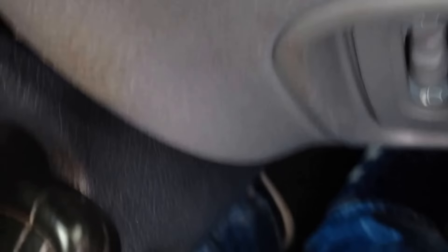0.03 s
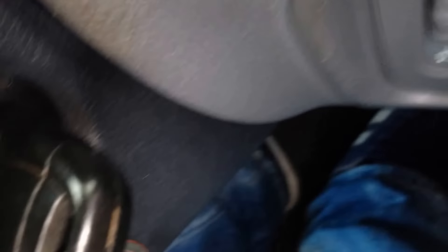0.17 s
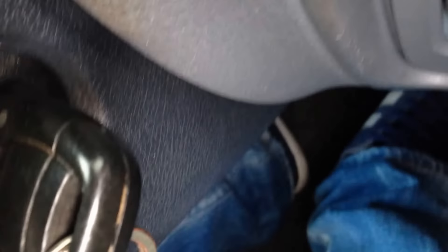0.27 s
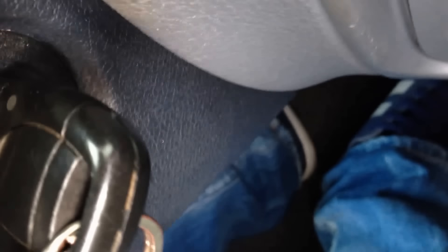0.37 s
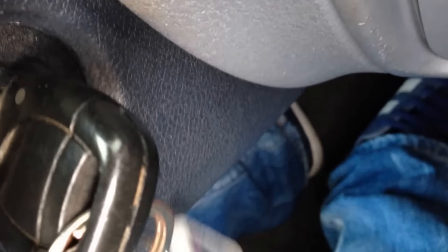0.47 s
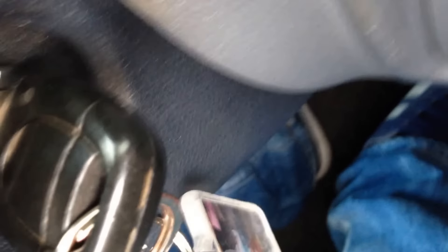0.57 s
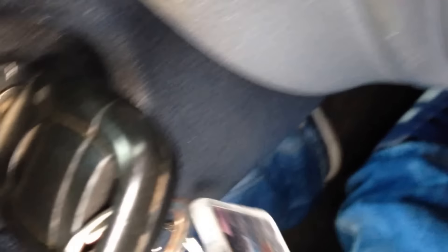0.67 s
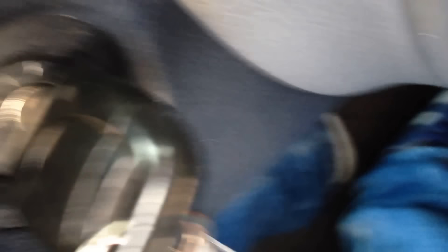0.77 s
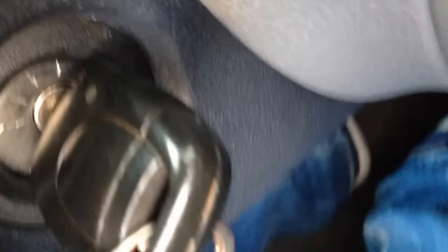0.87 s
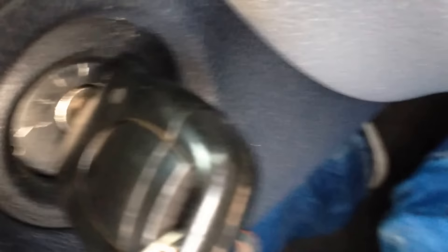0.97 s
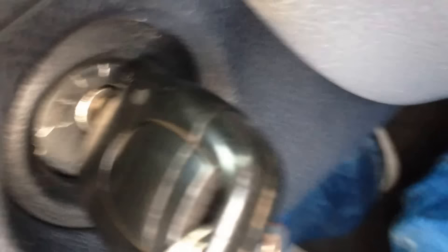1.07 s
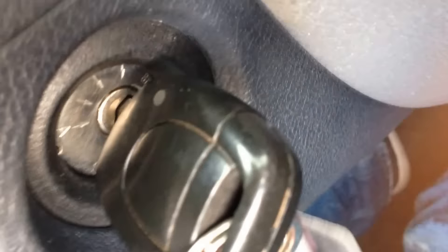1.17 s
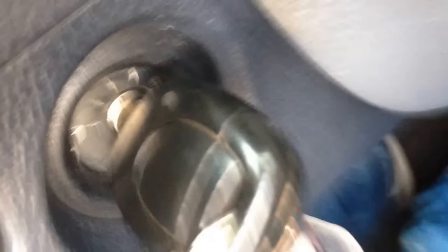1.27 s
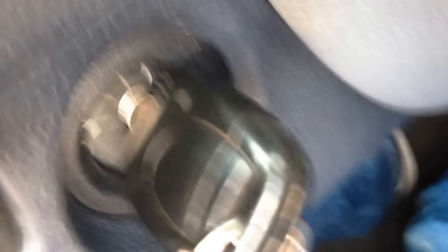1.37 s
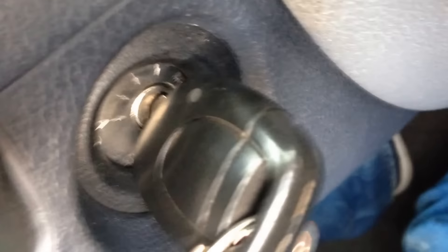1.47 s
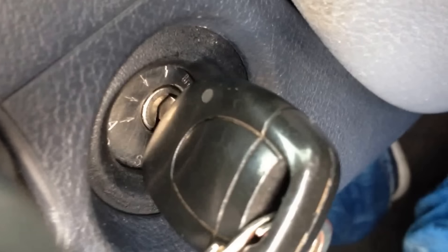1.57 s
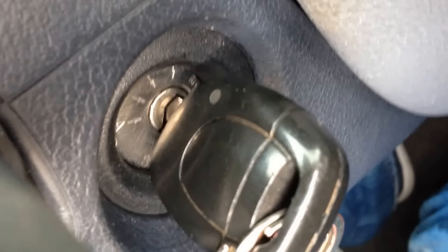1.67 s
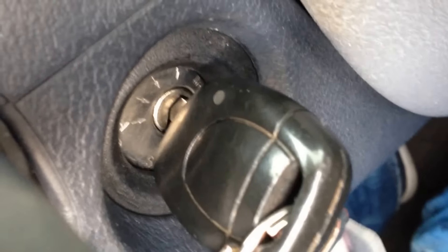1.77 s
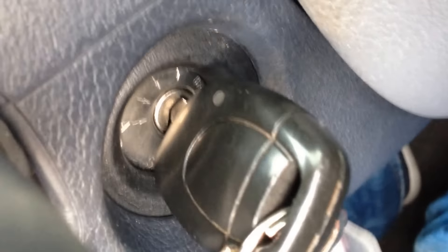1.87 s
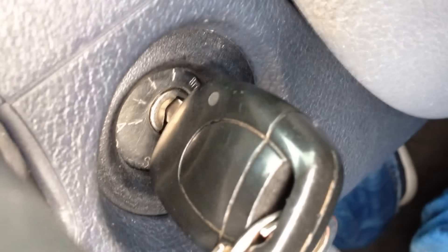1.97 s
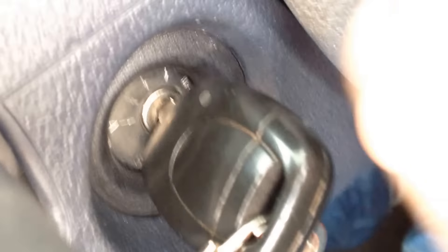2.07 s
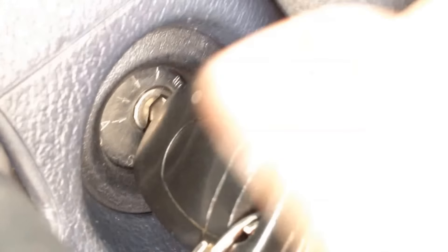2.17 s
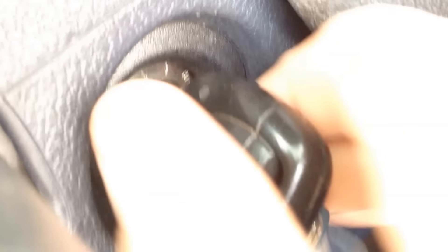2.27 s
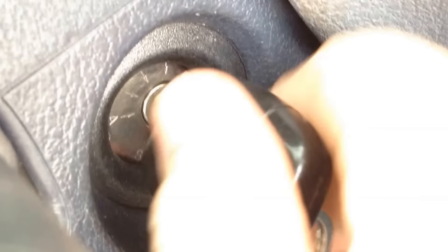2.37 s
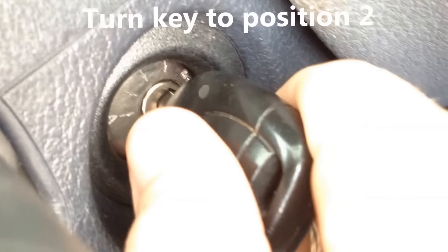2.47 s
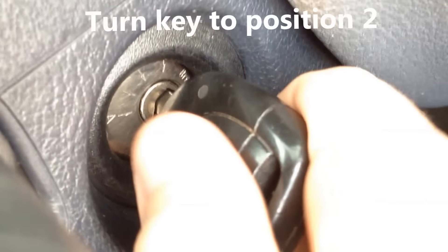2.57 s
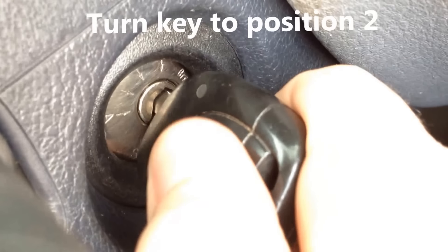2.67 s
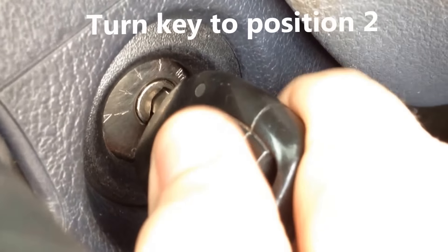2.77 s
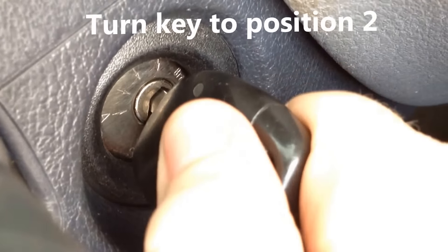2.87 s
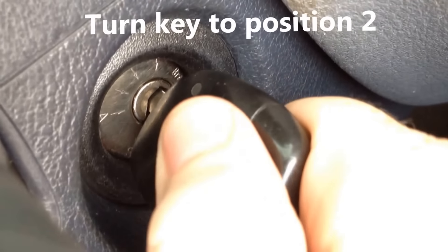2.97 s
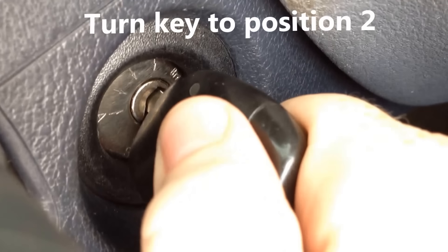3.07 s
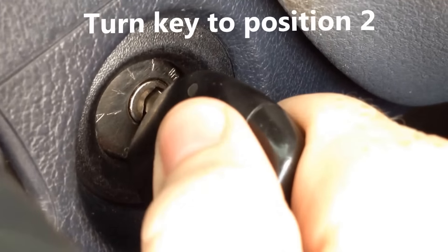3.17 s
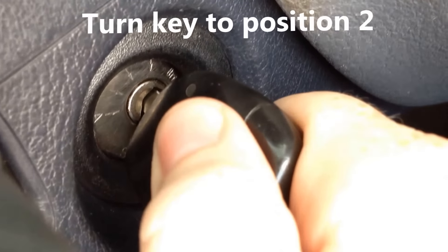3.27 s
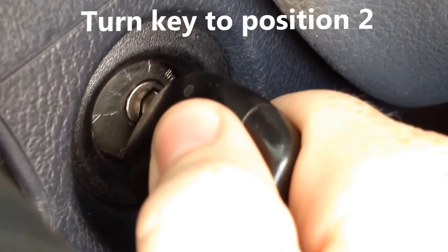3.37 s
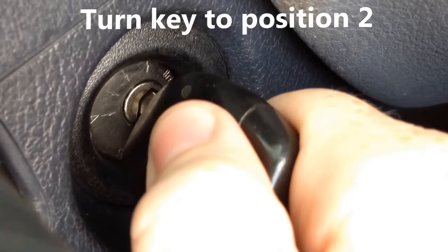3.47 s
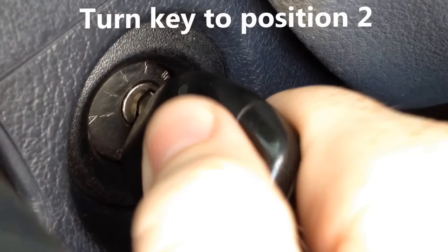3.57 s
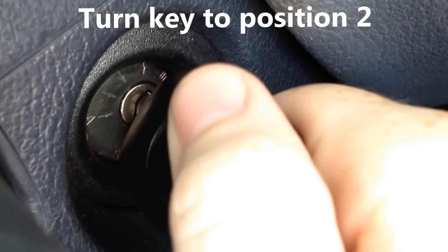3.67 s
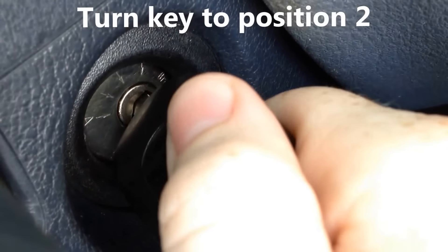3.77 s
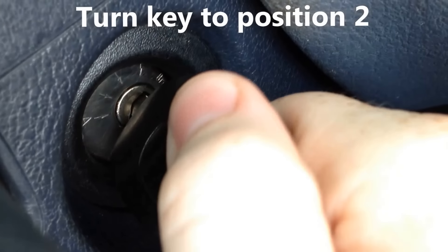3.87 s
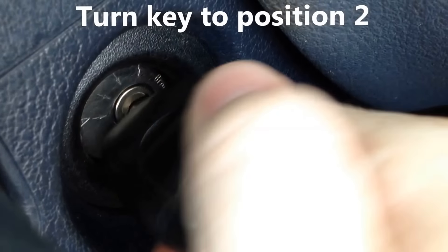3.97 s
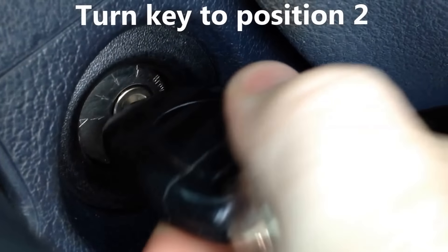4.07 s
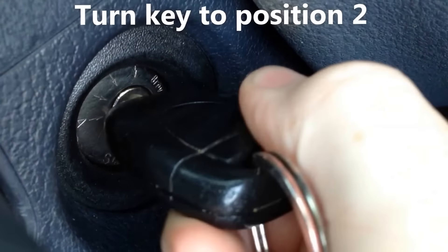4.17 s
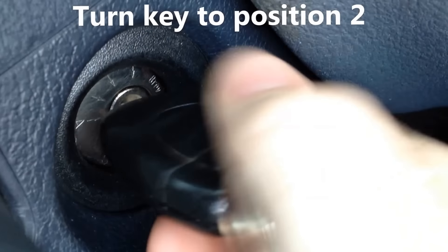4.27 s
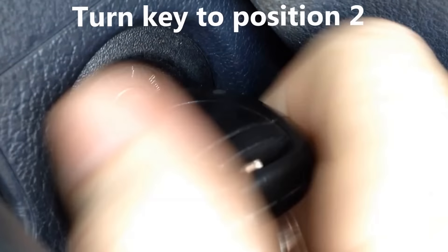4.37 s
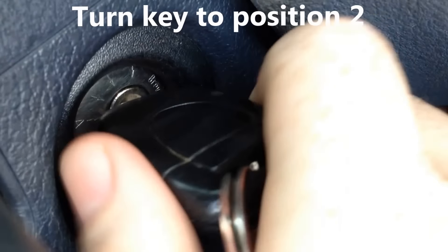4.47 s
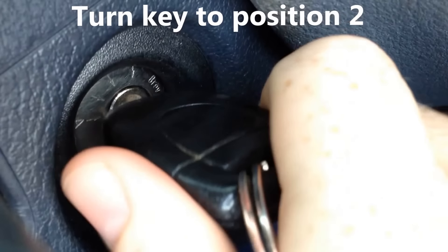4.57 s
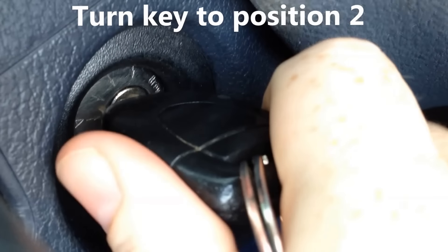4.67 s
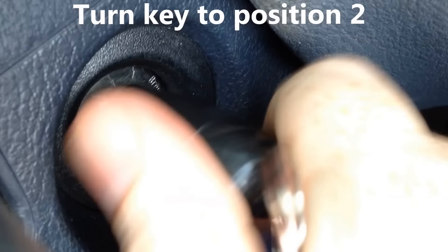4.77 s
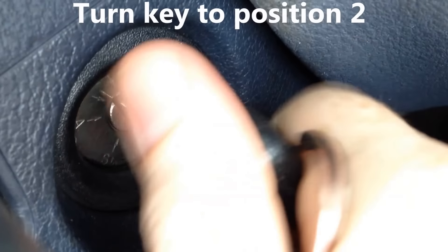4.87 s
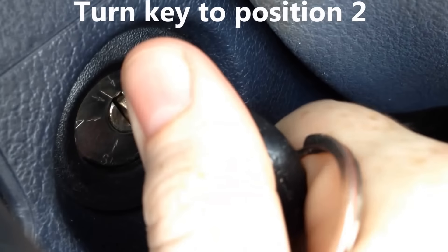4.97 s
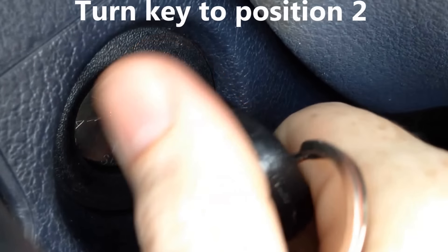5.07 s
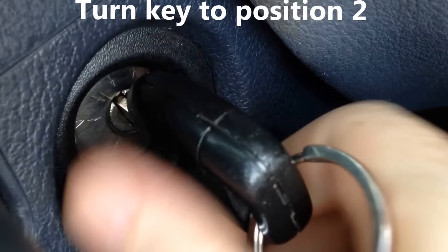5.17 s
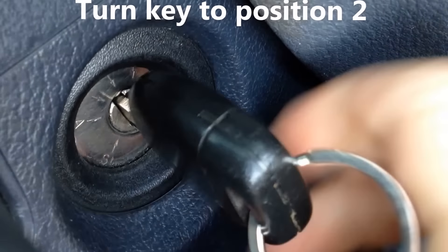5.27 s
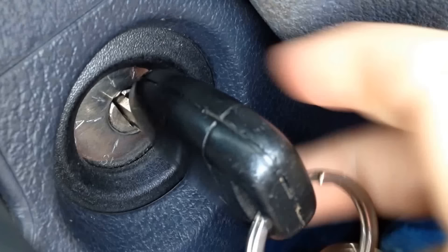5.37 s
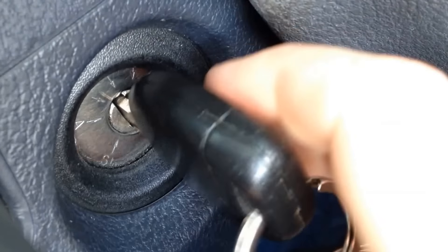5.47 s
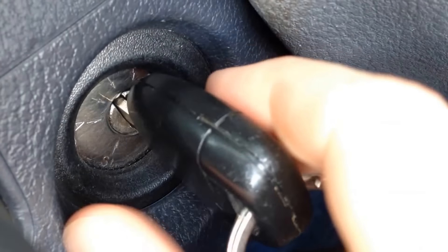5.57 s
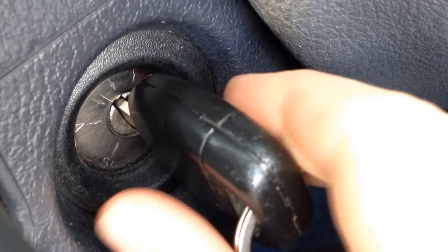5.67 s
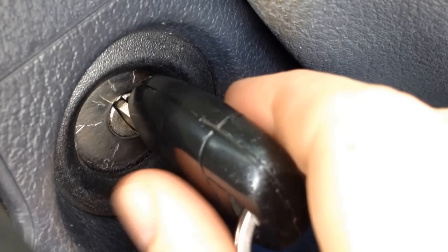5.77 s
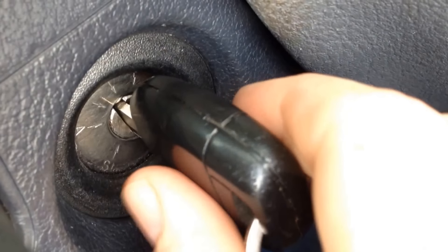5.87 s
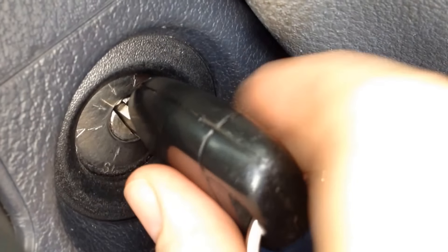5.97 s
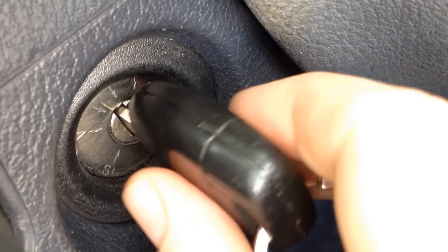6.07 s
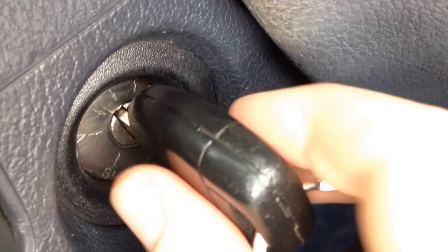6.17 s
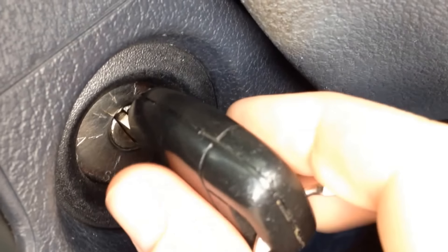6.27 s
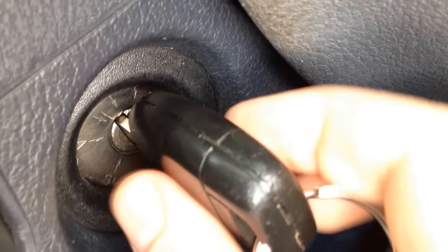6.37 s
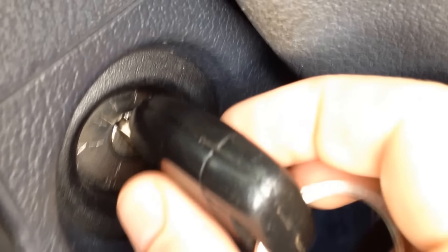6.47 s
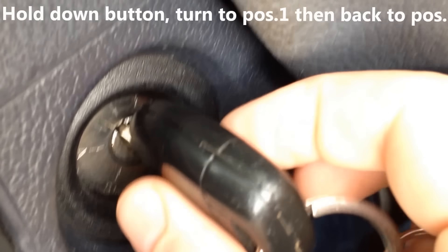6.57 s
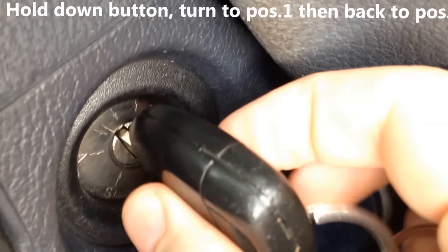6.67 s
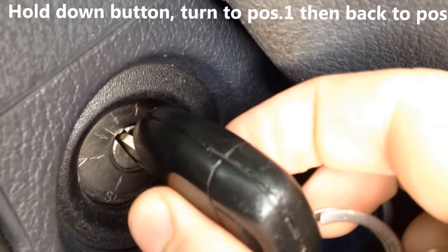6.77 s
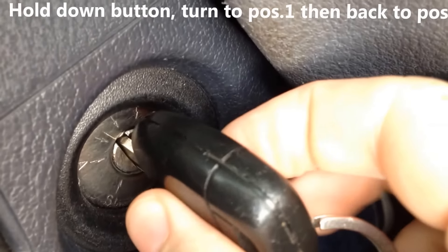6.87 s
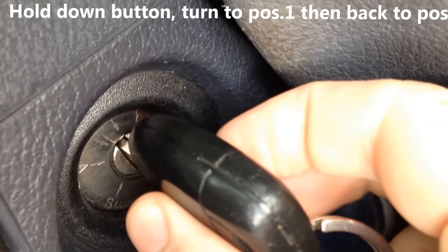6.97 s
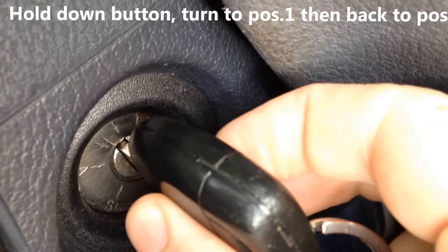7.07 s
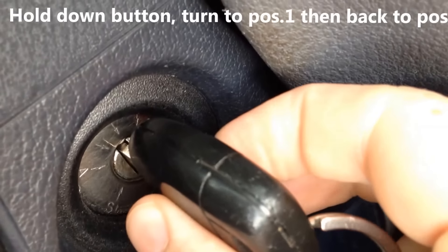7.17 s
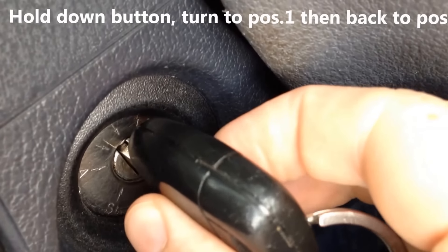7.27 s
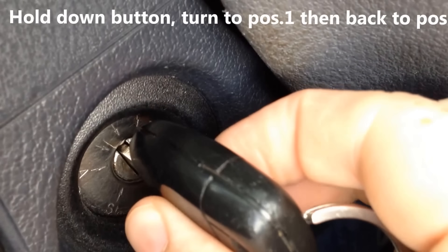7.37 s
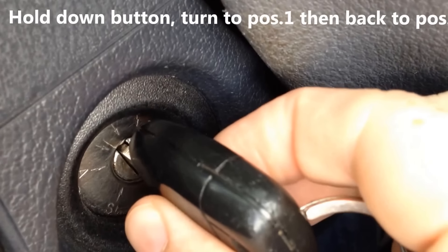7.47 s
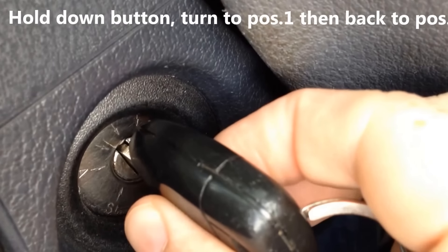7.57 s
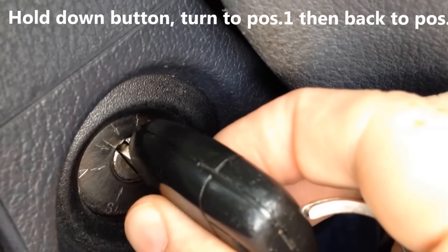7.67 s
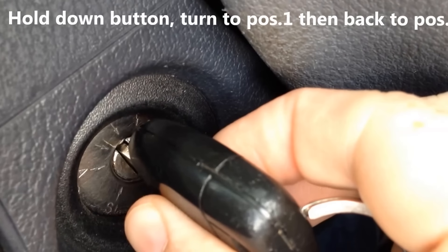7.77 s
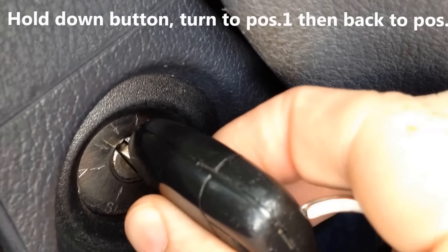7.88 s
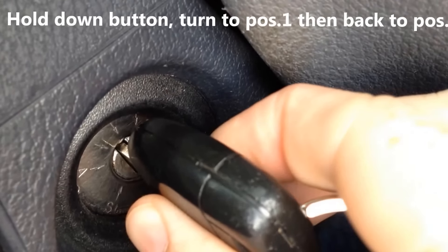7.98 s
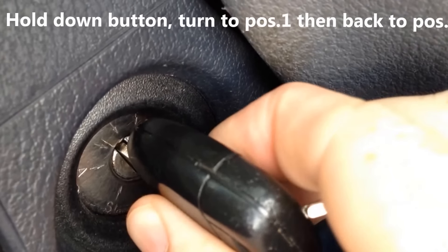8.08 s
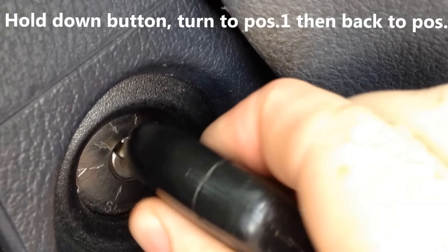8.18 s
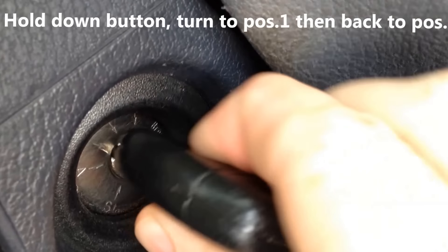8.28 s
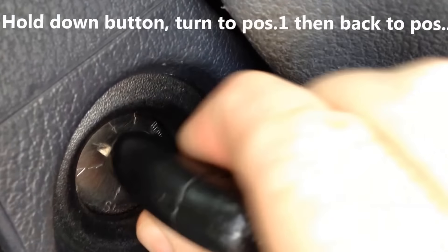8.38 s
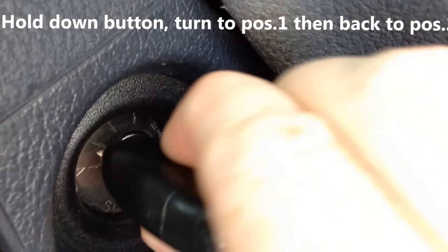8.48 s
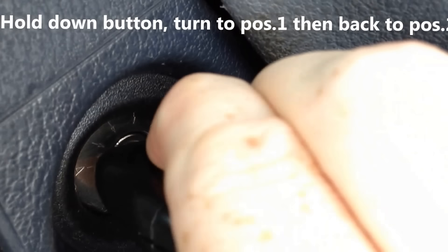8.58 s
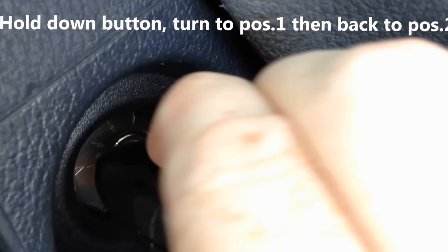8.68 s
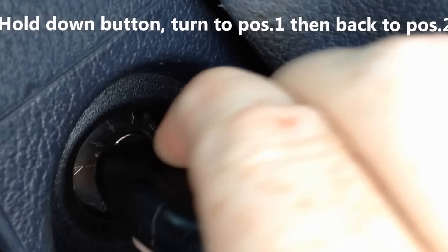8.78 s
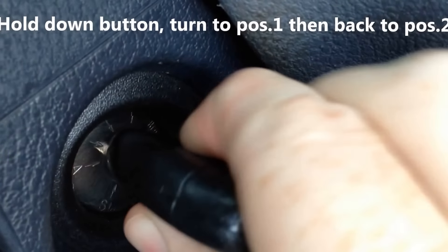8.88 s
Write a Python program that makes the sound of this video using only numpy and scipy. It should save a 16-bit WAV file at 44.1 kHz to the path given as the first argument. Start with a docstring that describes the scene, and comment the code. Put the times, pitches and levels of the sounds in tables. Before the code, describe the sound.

Very close, dry sound inside a quiet parked car. Soft bumps and brushing fingers come first, with a few light clicks. Then the key turns: hard snappy lock catches with dull plastic knocks from the column, in a quick irregular cluster. The steel key ring clinks in a short bright chatter, followed by scattered small clicks, a crisp button snap and faint regripping, over low handling rumble and hiss.

```python
"""A hand works a car key in the ignition lock, close to a hand-held microphone in a quiet, dead cabin.
First come bumps (low decaying sines), brushing fingers (filtered noise), a groan and light clicks.
From about 2 to 5 s the lock catches, thickest after 4 s: a crack, a short shudder and a modal column knock.
The steel ring then clinks (decaying sines and chatter), clicks go on, a button snaps at 7.5 s,
and regripping, knocks and a last catch follow; hush, rumble and hiss (shaped noise) lie under it all."""
import sys
import numpy as np
from scipy import signal
from scipy.fft import rfft, irfft, next_fast_len
from scipy.io import wavfile
from scipy.ndimage import uniform_filter1d, map_coordinates

SR = 44100
rng = np.random.default_rng(int(sys.argv[2]) if len(sys.argv) > 2 else 0)


def bounce(signal):
    """Save signal as a 16-bit WAV file at the path given by the first command-line argument."""
    frames = np.transpose(np.atleast_2d(signal))
    limited = np.clip(frames, -1, 1)
    pcm = np.round(limited * 32767).astype(np.int16)
    wavfile.write(sys.argv[1], SR, pcm)


N = 393813
TIME = np.arange(N) / SR  # scene clock, s
AGE = np.arange(SR // 4) / SR  # time since a contact, s
AGE_SPAN_S = len(AGE) / SR
TOP_HZ = 15300  # upper band limit


def amp(db):
    """Decibels to gain."""
    return 10 ** (np.asarray(db) / 20)


def unit(x):
    """Scale to rms 1."""
    return x / np.sqrt(np.mean(x ** 2) + 1e-20)


def packed(x):
    """Scale to the energy of one millisecond at rms 1."""
    return x * np.sqrt(SR / 1000 / np.sum(x ** 2))


def along(points, hz):
    """Read (f/Hz, value) points on a log frequency axis."""
    f, v = np.transpose(points)
    return np.interp(np.log(hz + 1), np.log(f), v)


def add(track, s, x):
    """Mix x into the track from time s."""
    part = track[max(round(s * SR), 0):][:len(x)]
    part += x[:len(part)]


def wobble(rate):
    """A smooth random curve, rate knots a second."""
    knots = rng.standard_normal(int(N * rate / SR) + 4)
    return map_coordinates(knots, [TIME * rate])


def coloured(x, db_of):
    """Causal minimum-phase filter whose gain is db_of(f/Hz)."""
    m = 2 * next_fast_len(len(x) // 2 + 1024)
    gain = amp(db_of(np.fft.rfftfreq(m, 1 / SR)))
    cepstrum = irfft(np.log(gain + 1e-6))
    # fold the cepstrum onto positive time
    cepstrum[1:m // 2] *= 2
    cepstrum[m // 2 + 1:] = 0
    return irfft(rfft(x, m) * np.exp(rfft(cepstrum)))[:len(x)]


def noise_bed(spectrum):
    """Steady noise of the given spectrum, rms 1."""
    return unit(coloured(rng.standard_normal(N), lambda hz: along(spectrum, hz)))


def fade(t60):
    """An exponential decay by 60 dB in t60 seconds, played no shorter than 2 ms."""
    return 10 ** (-3 * AGE / max(t60, .002))


def burst(t60):
    """A decaying noise burst with its spectrum smoothed flat."""
    x = rng.standard_normal(len(AGE)) * fade(t60)
    power = np.abs(uniform_filter1d(np.abs(rfft(x)) ** 2, size=450))
    bins_hz = np.fft.rfftfreq(len(x), 1 / SR)
    return packed(coloured(x, lambda hz: -10 * np.log10(np.interp(hz, bins_hz, power))))


# outside hush over time: t/s, level/dB before the air trim
HUSH_LEVEL = [(0.0, -66), (1.56, -67), (3.68, -67), (4.13, -61), (5.0, -63), (5.84, -66.5), (8.93, -68.5)]
# outside hush through the closed car, spectrum: f/Hz, level/dB
HUSH_SPECTRUM = [(71, -36.5), (120, 4), (163, -20.5), (198, 2.5), (265, -6), (316, -0.5), (388, -6.5),
                 (577, -5), (680, -7.5), (880, -1.5), (1130, -5.5), (1410, -12), (1680, -15.5),
                 (2100, -21.5), (4000, -32), (5200, -59.5), (8800, -120)]
# rumble of the held microphone, spectrum: f/Hz, level/dB
RUMBLE_SPECTRUM = [(12, -51), (20, -30.5), (36, -9), (54, 2.5), (81, 0), (113, -0.5), (155, -8),
                   (217, -4.5), (260, -9.5), (340, -35.5), (570, -120)]
ARM_SETTLE_S = 0.41  # the holding hand is stirred this long around a movement
RUMBLE_GROWS = .5  # stirred rumble, dB per dB of movement
HISS_DB = -74  # the microphone's steady hiss


def cabin(move_db, still_db, stirred_db, air_db):
    """A soft outside hush in the closed car, a faint hiss, and a handling rumble that grows with movement."""
    stir = amp(RUMBLE_GROWS * (move_db - move_db.max()))
    stir = uniform_filter1d(stir, size=max(round(ARM_SETTLE_S * SR), 1))
    rumble = noise_bed(RUMBLE_SPECTRUM) * amp(2 * wobble(9))
    air = noise_bed(HUSH_SPECTRUM) * amp(.7 * wobble(8))
    hiss = noise_bed([(900, -19.5), (2400, 1.5), (5000, -0.5), (10000, -3.5), (15000, -3.5)])
    rumble_gain = amp(still_db) + amp(stirred_db) * stir
    hush_db = np.interp(TIME, *np.transpose(HUSH_LEVEL)) + air_db
    return rumble_gain * rumble + amp(hush_db) * air + amp(HISS_DB) * hiss


# the hand leans on the column and it groans: t/s, length/s, level/dB, nominal f/Hz just above the band
COLUMN_GROANS = [(0.763, 0.18, -60, 78), (2.752, 0.69, -68, 57), (7.68, 0.67, -61, 61)]


def groans():
    """Narrow low swells of filtered noise under the weight of the hand."""
    out = np.zeros(N)
    for s, length, db, hz in COLUMN_GROANS:
        band = signal.butter(2, [hz * 0.78, hz * 0.98], "band", fs=SR, output="sos")
        swell = signal.sosfilt(band, rng.standard_normal(SR))[-round(length * SR):]
        add(out, s, amp(db) * unit(swell) * signal.windows.tukey(len(swell)))
    return out


# the hand reaches, takes hold, turns and regrips: t/s, length/s, movement level/dB
HAND_MOVES = [(0.752, 0.21, -74), (1.057, .29, -75.5), (1.557, .12, -79), (2.023, .27, -65.5),
              (2.323, .14, -73.5), (2.5, .2, -65), (2.761, .25, -74.5), (3.677, 0.13, -77),
              (4.073, .22, -69.5), (4.346, 0.19, -60), (4.88, 0.24, -69), (5.233, 0.46, -63),
              (5.715, 0.41, -75), (6.158, .43, -68.5), (6.671, .28, -70), (8.233, .22, -71),
              (8.553, .38, -73.5)]
MOVE_ATTACK_S, MOVE_RELEASE_S = .1, 0.15  # every movement swells and dies away alike


def movement(rest_db):
    """How briskly the hand moves, in dB: each move swells, holds and dies away."""
    power = np.full(N, amp(rest_db) ** 2)
    for s, length, db in HAND_MOVES:
        gate = np.minimum((TIME - s) / MOVE_ATTACK_S, (s + length - TIME) / MOVE_RELEASE_S)
        power += (amp(db) * np.clip(gate + .5, 0, 1)) ** 2
    return 10 * np.log10(power)


def thud(db, hz, t60, rise=.0018):
    """A soft push on plastic: a few low cycles."""
    onset = 1 - np.exp(-(AGE / rise) ** 2)
    return amp(db) * np.sin(2 * np.pi * hz * AGE) * fade(t60) * onset


def pats(move_db, above_db, spread_db, hz, count):
    """The shifting hand pats the column at random, mostly while it moves."""
    out = np.zeros(N)
    motion = np.cumsum(amp(move_db / 2))
    for when, size, pitch in rng.random((count, 3)):
        at = np.searchsorted(motion, when * motion[-1])
        db = move_db[at] / 2 + above_db + spread_db * size
        add(out, at / SR, thud(db, hz * 4 ** (pitch - .5), .05))
    return out


# soft bumps of hand and column: t/s, level/dB before the mix trim, f/Hz, t60/s
SOFT_BUMPS = [(0.2963, -20.5, 203, 0.028), (.2965, -39, 630, 0.021), (1.101, -43.5, 108.4, 0.079),
              (1.662, -35.5, 169.4, 0.092), (1.922, -24, 121, 0.016), (2.046, -25.5, 431, 0.04),
              (2.068, -41.5, 109, .13), (4.246, -33, 128, 0.15), (4.995, -21, 244, 0.047),
              (5.052, -32, 168, .05), (5.059, -33.5, 75, 0.26), (5.096, -32, 124, 0.055),
              (5.626, -35.5, 233, 0.062)]


def bumps():
    """Flesh pushes plastic into a few damped low cycles."""
    out = np.zeros(N)
    for s, db, hz, t60 in SOFT_BUMPS:
        add(out, s, thud(db, hz, t60))
    return out


def friction(spectrum, grain_db):
    """Grainy, uneven noise of skin brushing textured plastic."""
    grains = rng.standard_normal(N) * amp(grain_db * wobble(700))
    spectra = signal.stft(grains, nperseg=512)[2]
    # random patches of level, smoothed across frequency, then time
    patches = uniform_filter1d(rng.standard_normal(spectra.shape), size=6, axis=0)
    patches = unit(uniform_filter1d(patches, size=7, axis=1))
    brushing = signal.istft(spectra * amp(1.6 * patches), nperseg=512)[1][:N]
    return unit(coloured(brushing, lambda hz: along(spectrum, hz)))


# skin on plastic, spectrum: f/Hz, level/dB
SKIN_SPECTRUM = [(900, -26.5), (2000, 1.5), (3000, -5.5), (4500, -2), (7000, -4.5), (10500, -4),
                 (13500, -2), (15300, -1.5)]
# hollow fob sounded by rubbing, spectrum: f/Hz, level/dB
FOB_SPECTRUM = [(1200, -26.5), (2000, -10.5), (2350, 1.5), (2700, -6), (3100, 2.5), (3700, -12),
                (5000, -13.5), (9000, -33)]
# short slips of fingers and ring on the fob:
# t/s, length/s, level/dB, squeak f/Hz (held to TOP_HZ), squeak level/dB relative to the slip
FOB_SLIPS = [(1.238, 0.091, -67.5, 3280, 2), (2.037, 0.06, -66.5, 2460, 3),
             (2.356, 0.059, -60.5, 3100, -3.5), (2.71, 0.11, -80, 4800, 1),
             (4.204, 0.042, -50.5, 3000, -11), (4.347, 0.087, -65, 13500, 1),
             (4.471, 0.044, -52, 3500, -21), (4.88, 0.062, -61.5, 2420, -1),
             (5.033, 0.022, -48.5, 11600, -5), (5.054, 0.066, -64.5, 2840, 5),
             (5.125, 0.097, -68, 2920, -2), (5.228, 0.09, -70.5, 7900, 11),
             (5.752, 0.023, -57.5, 12000, -11), (6.86, 0.038, -58.5, 3250, -9),
             (6.901, .11, -68.5, 3250, -4), (8.243, 0.089, -67, 2800, -0.5), (8.346, 0.029, -53, 3000, -16),
             (8.4, 0.078, -67.5, 2800, 4.5)]


def fingers(move_db, hiss_db, fob_db):
    """Moving skin brushes the plastic and sounds the hollow fob; slips swell and excite a narrow squeak."""
    grain_db = np.clip((move_db + 66.5) * .25, 0, 3)  # firmer rubbing is coarser
    out = amp(move_db + hiss_db + .7 * wobble(37)) * friction(SKIN_SPECTRUM, grain_db)
    out += amp(move_db + fob_db + 3.1 * wobble(30)) * friction(FOB_SPECTRUM, grain_db=8)
    rough = friction(SKIN_SPECTRUM, grain_db=3.0)
    for s, length, db, hz, squeak_db in FOB_SLIPS:
        stroke = rough[round(s * SR):][:round(length * SR)]
        resonance = signal.iirpeak(min(hz, TOP_HZ), hz / 600, SR)  # about 600 Hz wide
        squeak = unit(signal.filtfilt(*resonance, stroke))
        swell = signal.windows.tukey(len(stroke), .8)
        add(out, s, amp(db) * swell * (stroke + amp(squeak_db) * squeak))
    return out


def ticks(move_db, above_db, spread_db, count):
    """Loose ring and keys tick faintly, more often and louder the more the fingers move."""
    out = np.zeros(N)
    motion = np.cumsum(amp(move_db))
    for when, size, mode in rng.random((count, 3)):
        at = np.searchsorted(motion, when * motion[-1])
        hz = RING_MODES[int(mode * len(RING_MODES))][0]
        line = np.sin(2 * np.pi * hz * AGE) * fade(.03)
        tick = packed(rng.standard_normal(len(AGE)) * fade(0.0099)) + 0.53 * packed(line)
        add(out, at / SR, amp(move_db[at] + above_db + spread_db * size ** 2) * tick)
    glint = [(2200, -1), (3200, 4.5), (5000, 1.5), (9000, 1)]  # f/Hz, level/dB
    return coloured(out, lambda hz: along(SNAP_SPECTRUM, hz) + along(glint, hz))


def shimmer(t60, count):
    """Scattered modes of small parts, other ones for each point of contact."""
    age = AGE[:len(AGE) // 2]
    hz = rng.uniform(1500, TOP_HZ, (count, 1))
    size, phase = rng.random((2, count, 1))
    modes = np.sum(size * np.sin(2 * np.pi * (hz * age + phase)), axis=0)
    return packed(modes * fade(t60)[:len(age)])


def contact(db_of, t60, crack_db, tail_db, tail_t60):
    """A hard contact: a crack and its instant rebound, the part's short shudder and a weak ringing tail."""
    crack = np.zeros(len(AGE))
    crack[[4, rng.integers(14, 48)]] = 1, rng.uniform(-.6, .6)
    blow = amp(crack_db) * packed(crack) + burst(t60)
    add(blow, 0, amp(tail_db) * shimmer(tail_t60, count=45))
    return packed(coloured(blow, db_of))


def rebounds(first_db, t60, count):
    """Loose steel chatters: more touches, closest together at first and weaker the later they come."""
    train = np.zeros(SR // 30)
    at = SR // 1000 + (rng.random(count) ** 2 * (SR // 35)).astype(int)
    train[at] = amp(first_db) * fade(t60)[at] * rng.standard_normal(count)
    train[0] = 1
    return train


# the steel ring meets fob and keys:
# t/s, level/dB as if packed in 1 ms before the mix trim, bite/dB up to 3 kHz, top/dB from 8 kHz
RING_CLINKS = [(5.3781, -30, -5.5, -18), (5.3957, -33, -7, -25), (5.4164, -28.5, 16, -9),
               (5.4233, -13, -12.5, -13), (5.4383, -14.5, -9, -3), (5.447, -20, 6.5, -4),
               (5.452, -8.5, -12, -7.5), (5.539, -24.5, 2, -10), (5.5463, -13, -0.5, 2),
               (5.5513, -15.5, 6, -1.5), (5.5648, -23, -8, -9), (6.254, -37.5, 0, -18),
               (6.3182, -29.5, -8.5, 2), (6.3842, -40.5, -2, -22), (6.4491, -45, 0, 21),
               (6.5689, -30, 3.5, -7), (6.6231, -34.5, 9, -1.5)]
# modes of the steel ring: f/Hz, level/dB before random spread, t60/s before the fingers' damping
RING_MODES = [(2533, -3, 0.099), (4620, -18, .1), (5060, -19.5, 0.075), (5100, -16, .07), (5670, -20, 0.12),
              (6837, 4.5, 0.055), (8110, -9.5, 0.0746), (9570, 2.5, .09), (10980, -2, 0.073),
              (11350, -7, 0.079), (14000, 3.5, 0.089), (15080, -2.5, 0.061)]
# touch of ring on its neighbours, spectrum: f/Hz, level/dB
CHINK_SPECTRUM = [(200, -9.5), (1000, -16.5), (1450, -1), (1900, -11), (2600, -1), (3800, -2), (5100, 4),
                  (6500, -5.5), (8500, 3.5), (11000, 2), (15300, 2.5)]
CLINK_T60_S = 0.014  # the shudder of each touch
RING_GROWS = .08  # harder clinks ring more freely, dB per dB


def key_ring(ring_db):
    """Clinks ring the steel modes at new strengths; the ring chatters on its neighbours, damped by fingers."""
    out = np.zeros(N)
    for s, db, bite_db, top_db in RING_CLINKS:
        tone = lambda hz: along([(3000, bite_db), (4800, 0.0087), (6000, 0.00071), (8000, top_db)], hz)
        ring = 0
        for hz, level, life in RING_MODES:
            # drifting phase blurs each line a little
            chatter = np.cumsum(rng.standard_normal(len(AGE))) / np.sqrt(SR)
            strength = amp(level + tone(hz) + 4 * rng.normal())
            line = np.sin(2 * np.pi * (hz * AGE + rng.random() + chatter))
            ring = ring + strength * fade(min(life, .075)) * line  # fingers cap the ringing
        strike = contact(lambda hz: along(CHINK_SPECTRUM, hz) + tone(hz), CLINK_T60_S,
                         crack_db=-9, tail_db=-10, tail_t60=0.052)
        touches = rebounds(first_db=-10, t60=0.098, count=9)
        strike = packed(signal.fftconvolve(strike, touches)[:len(AGE)])
        add(out, s, amp(db) * (strike + amp(ring_db + RING_GROWS * db) * packed(ring)))
    return out


# strong modes of the column shroud: f/Hz, width/Hz, level/dB
COLUMN_MODES = [(224.2, 110, -4.5), (440, 6.4, -1.5), (549.3, 16, 0), (827, 25, -14.5), (995, 15, -8),
                (1210, 26, -7.5), (1390, 50, -3), (1670, 33, -17), (2243, 38, -6.5), (2570, 20, -9),
                (3260, 29, -9), (3630, 67, -9.5), (3900, 65, -18.5), (5900, 110, -12.5)]
# dense weak modes of the shroud, spectrum: f/Hz, level/dB
SHELL_SPECTRUM = [(35, -51), (70, -4.5), (130, 1), (250, -2.5), (700, 2), (1300, 1.5), (2500, -7.5),
                  (5700, -14), (7000, -27), (15000, -44.5)]
# the column sways after every knock: centre of the random pitch, delay, decay
THUD_HZ, THUD_LAG_S, THUD_T60_S = 244, .007, 0.076
THUD_DB, THUD_GROWS = -17, 0.77  # level after a knock of 0 dB; dB per dB of knock


def knock(db, hardness, t60, dense_db=-0.5, tail_db=-6.5):
    """A kick to the column shroud: a few strong modes among many weak ones, then the column's low thud."""
    modes = 0
    for hz, width, level in COLUMN_MODES:
        line = np.sin(2 * np.pi * (hz * AGE + rng.random()))
        modes = modes + amp(level) * np.sqrt(width) * np.exp(-np.pi * width * AGE) * line
    dense = burst(t60) + amp(tail_db) * burst(.082)
    dense = coloured(dense, lambda hz: along(SHELL_SPECTRUM, hz))
    body = packed(modes * fade(3.5 * t60)) + amp(dense_db) * packed(dense)
    # a soft blow leaves the high modes still
    out = amp(db) * packed(coloured(body, lambda hz: hardness * np.log2(np.hypot(1, hz / 400))))
    sway_hz = THUD_HZ * np.exp(0.11 * rng.normal())
    add(out, THUD_LAG_S, thud(THUD_DB + THUD_GROWS * db, sway_hz, THUD_T60_S))
    return out


# dull blows on the lock housing:
# t/s, level/dB as if packed in 1 ms before the mix trim, hardness/dB per octave, t60/s of the dense modes
HOUSING_KNOCKS = [(0.042, -43.5, -1.5, 0.02), (1.921, -38, -5, 0.012), (2.046, -27, -14.5, 0.13),
                  (3.83, -43, -2, .05), (4.2438, -17, 1.5, .063), (4.516, -33, -2, 0.087),
                  (4.7105, -22.5, 1.1, 0.057), (4.746, -36.5, -27, .034), (5.003, -24, -2, 0.034),
                  (5.034, -28.5, -4, 0.32), (5.223, -40.5, 0.5, 0.1), (5.546, -36, -1, 0.068),
                  (6.127, -41, -13, .07), (6.836, -45, -12, .06), (7.102, -44, -12, .05),
                  (7.495, -44.5, -16, .06), (8.252, -45, -2, 0.051), (8.358, -43, -12, .08),
                  (8.532, -42.5, -1, 0.16), (8.566, -43.5, -12, 0.07), (8.643, -41, -9.5, .08),
                  (8.811, -37.5, -1.6, 0.046)]


def housing():
    """The barrel's end stops and the hand knock the column shroud into its modes."""
    out = np.zeros(N)
    for s, db, hardness, t60 in HOUSING_KNOCKS:
        add(out, s, knock(db, hardness, t60))
    return out


# modes of the release button's plastic cap: f/Hz, level/dB at the onset, t60/s
BUTTON_MODES = [(1290, -43, 0.018), (1620, -31.5, 0.0094), (2257, -24.5, 0.014)]
BUTTON_AT_S = 7.4658  # the lock's release button snaps in


def button():
    """The cap adds a short hollow ring to the button's click."""
    out = np.zeros(N)
    for hz, db, t60 in BUTTON_MODES:
        add(out, BUTTON_AT_S, amp(db) * np.sin(2 * np.pi * hz * AGE) * fade(t60))
    return out


# stiff small parts snapping together, spectrum: f/Hz, level/dB
SNAP_SPECTRUM = [(100, -21), (600, -10), (1100, -2), (1500, 0), (1950, -0.5), (2500, 2.5), (3600, 0.5),
                 (6000, 0.5), (8000, 2), (10500, 0.5), (13000, 3.5), (15300, 0)]


def click(out_db, part_hz, bite_db, top_db, t60, lead_in_db=-21, lead_in_t60=.0125, octaves=0.91):
    """A hard contact of small stiff parts, in the middle of the result: a crack and a short shudder."""
    def tone(hz):
        """Snap colour, a treble tilt and a resonant bite around the part's own pitch."""
        bite = bite_db / (1 + (np.log2((hz + 1) / part_hz) / octaves) ** 2)
        return along(SNAP_SPECTRUM, hz) + along([(8000, 0.0089), (11000, top_db)], hz) + bite

    lead_in = rng.standard_normal(len(AGE)) * fade(lead_in_t60)
    lead_in = packed(coloured(lead_in, tone))[::-1]  # faint reversed noise ahead of the contact
    hit = contact(tone, t60, crack_db=-7.5, tail_db=-14.5, tail_t60=.039)
    return amp(out_db) * np.concatenate([amp(lead_in_db) * lead_in, hit])


# clicks of the key and the release button:
# t/s, level/dB as if packed in 1 ms before the mix trim, bite/dB, top/dB from 11 kHz,
# t60/s, played no shorter than 2 ms
LOOSE_CLICKS = [(1.269, -53, 13, 4, .027), (2.0474, -40, 28, -2, 0.016), (2.558, -27, -6, -5, 0.02),
                (2.5621, -31, 15, -8, 0.026), (2.713, -42, -6, -6, .007), (3.8288, -49, 12, -8, 0.0048),
                (4.055, -48, 15, 0, 0.034), (4.2239, -20, 2, 0, 0.014), (4.323, -41.5, 9, 6, .019),
                (4.5154, -34, 4, -5, 0.021), (4.5894, -22, 10.5, -5, 0.0056), (4.9787, -21, 3, -5, 0.005),
                (5.0035, -24, 8, 6, .012), (5.8935, -44, 1, -2, 0.022), (6.0417, -32.5, 24.5, -14, 0.0086),
                (6.117, -44.5, 8, -3.5, .007), (6.1723, -43, 17, -4.5, 0.012), (6.4853, -37, 22, 5, 0.02),
                (6.5938, -35.5, 13, -26, 0.0078), (6.7086, -42.5, 20, -26, 0.0017),
                (6.7975, -21.5, 16, -2, 0.019), (6.814, -35, 1, -3, 0.0077), (6.8266, -38, 14, -30.5, .009),
                (7.037, -50.5, 10, 3, .014), (7.0844, -35, 8, 8.5, 0.013), (7.157, -47.5, 5, 0, 0.016),
                (7.4659, -21, 2.5, 0, 0.0051), (7.703, -42.5, 1.5, 4, .004), (8.258, -41.5, 20, 2, 0.009),
                (8.621, -36, 12, -12, 0.028), (8.7907, -40, 12.5, 0, 0.0065), (8.894, -37.5, 5, -2, 0.03)]
KEY_HZ = 3040  # main resonance of the key in its fob


def clicks():
    """Hard contacts of the key and the release button, some beside housing knocks."""
    out = np.zeros(N)
    for s, db, bite_db, top_db, t60 in LOOSE_CLICKS:
        add(out, s - AGE_SPAN_S, click(db, KEY_HZ, bite_db, top_db, t60, octaves=0.9))
    return out


# the lock catches as the key turns, levels before the mix trim:
# t/s, click level/dB as if packed in 1 ms, bite/dB, top/dB from 11 kHz, knock level/dB, hardness/dB per octave
LOCK_CATCHES = [(2.3764, -44.5, 14, 2, -41, -3.5), (4.1033, -46.5, 27, -7.5, -37.5, -2.5),
                (4.1755, -25.5, 12.5, -3.5, -37, 3), (4.1893, -30, -1, -14.5, -34, 2.5),
                (4.2361, -11.5, -2.5, -5.5, -25.5, -2.5), (4.4128, -28.5, 6.5, -2, -35, 0),
                (4.4945, -19.5, 7.5, -10, -23.5, -1.5), (4.677, -41.5, 26, -11, -33, -5.5),
                (4.8862, -42.5, 15, -12, -37, 1), (4.9124, -37.5, 9, -10, -37, -7.5),
                (4.9937, -13.5, 9.5, 3.5, -19, -1), (5.6123, -23.5, 11.5, 12, -33.5, -4.5),
                (8.6716, -27, 13, 1.5, -32.5, -6.5)]
LOCK_HZ = 2100  # the tumblers' main resonance
LOCK_T60_S, LOCK_HALVING_DB = .0055, 20.5  # decay of a 0 dB snap; one this much softer lasts twice as long
# a tumbler ticks just before each catch, the housing answers just after
LEAD_S, LEAD_DB, KNOCK_LAG_S = 0.0043, -18.5, .0015


def catches(lead_t60, knock_t60):
    """Each catch is an early tick, a snap that is shorter the harder it is, and a knock in the housing."""
    out = np.zeros(N)
    for s, db, bite_db, top_db, knock_db, hardness in LOCK_CATCHES:
        start = s - AGE_SPAN_S
        snap_t60 = LOCK_T60_S * 2 ** (-db / LOCK_HALVING_DB)
        add(out, start - LEAD_S, click(db + LEAD_DB, LOCK_HZ, bite_db, top_db, lead_t60))
        add(out, start, click(db, LOCK_HZ, bite_db, top_db, snap_t60))
        add(out, s + KNOCK_LAG_S, knock(knock_db, hardness, knock_t60))
    return out


def scene():
    """All is within arm's reach; the dashboard gives a faint short answer."""
    move_db = movement(rest_db=-85.5)
    background = cabin(move_db, still_db=-79.5, stirred_db=-58, air_db=4.5)
    hand = amp(1.34) * bumps() + groans()
    hand += pats(move_db, above_db=-20, spread_db=6.5, hz=170, count=50)
    hand += fingers(move_db, hiss_db=1.56, fob_db=-6.0)
    hand += ticks(move_db, above_db=3, spread_db=13, count=110)
    lock = amp(-.5) * key_ring(ring_db=-8.5) + amp(1.0) * housing() + button()
    lock += amp(-1.14) * clicks() + amp(0.15) * catches(lead_t60=0.013, knock_t60=.065)
    answer = signal.fftconvolve(lock, unit(burst(0.13)) / np.sqrt(len(AGE)))[:N]
    return (background + hand + lock + amp(-30.0) * answer)[None]


def record(dry):
    """The small microphone drops the deep bass, and nothing is kept above the band limit."""
    bass_cut = signal.butter(2, 36, "high", fs=SR, output="sos")
    band_limit = signal.ellip(12, .1, 80, TOP_HZ, fs=SR, output="sos")
    return signal.sosfilt(band_limit, signal.sosfilt(bass_cut, dry))


dry = scene()
out = record(dry)
bounce(out)
```